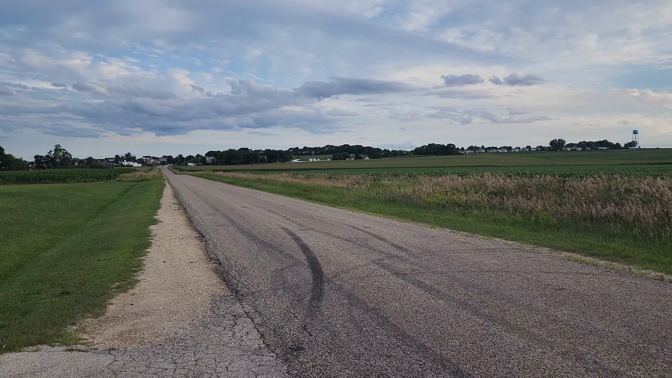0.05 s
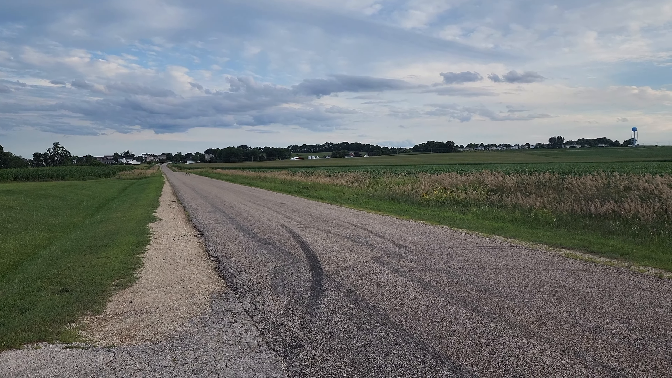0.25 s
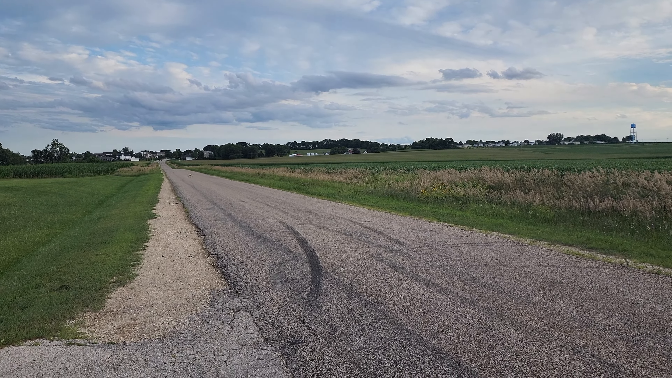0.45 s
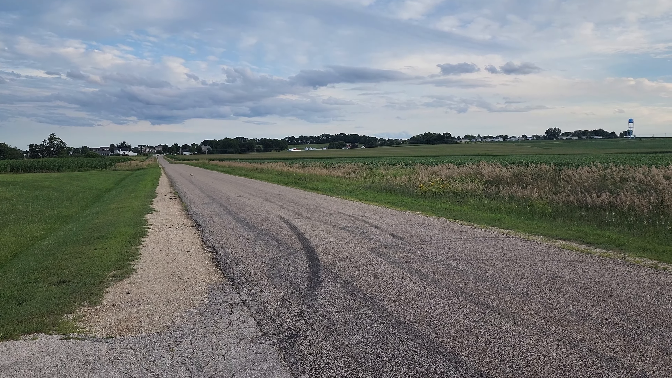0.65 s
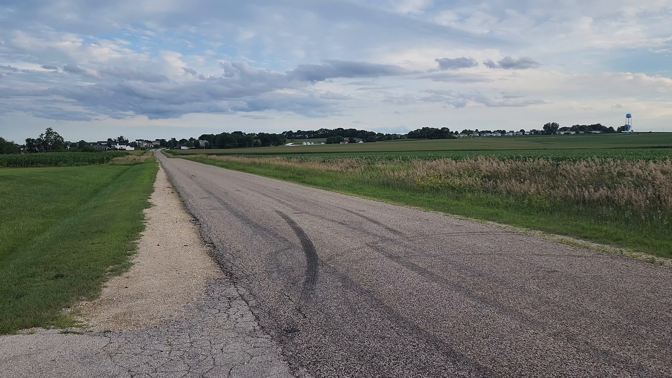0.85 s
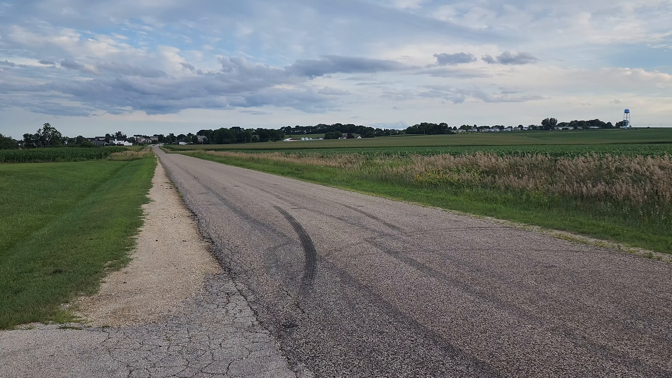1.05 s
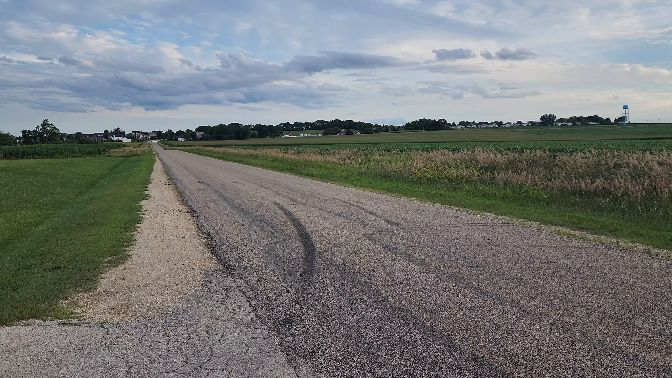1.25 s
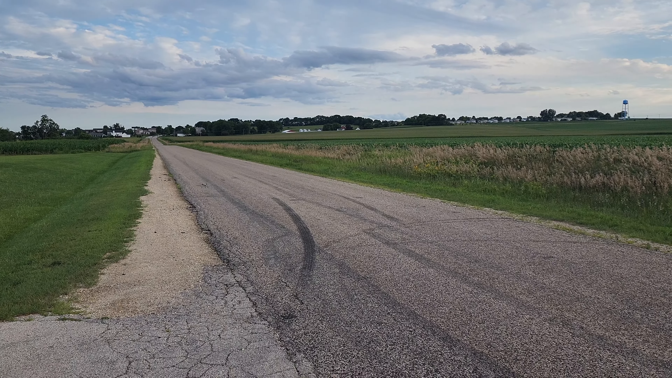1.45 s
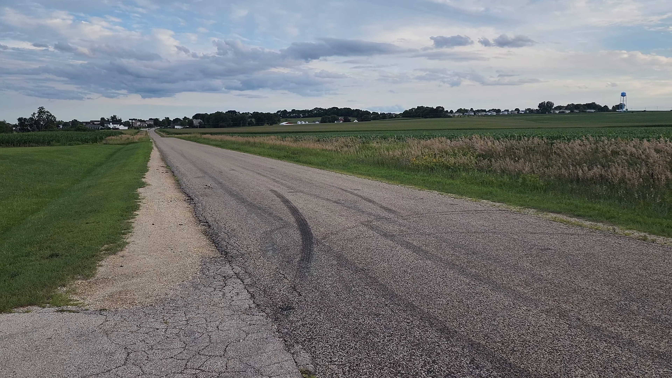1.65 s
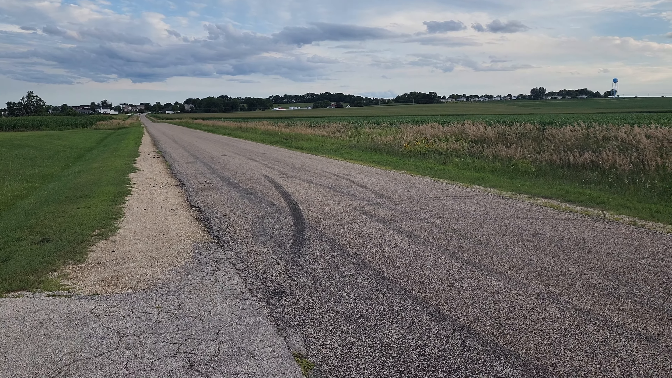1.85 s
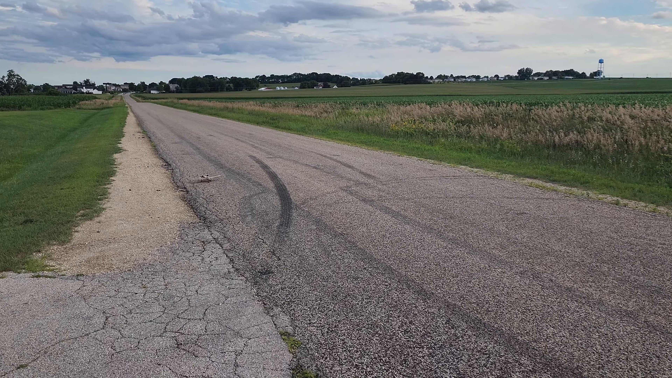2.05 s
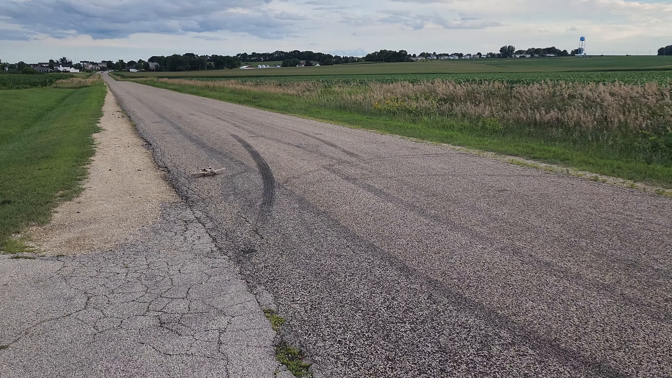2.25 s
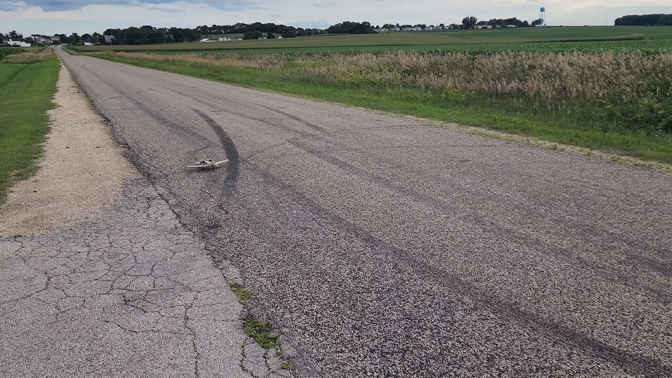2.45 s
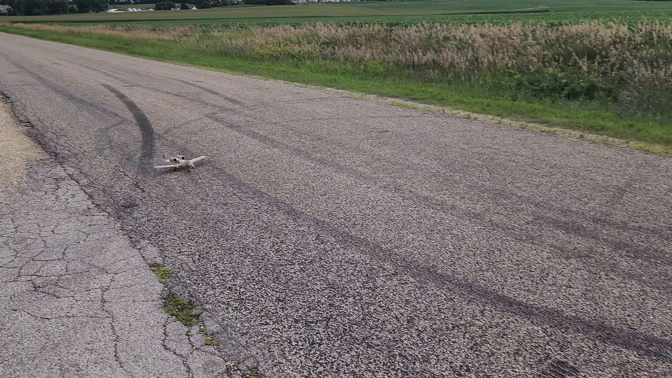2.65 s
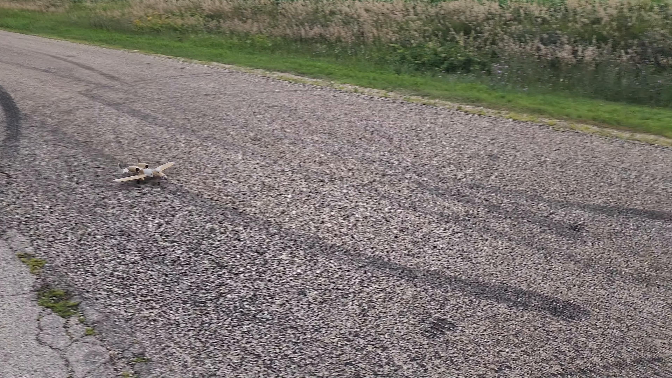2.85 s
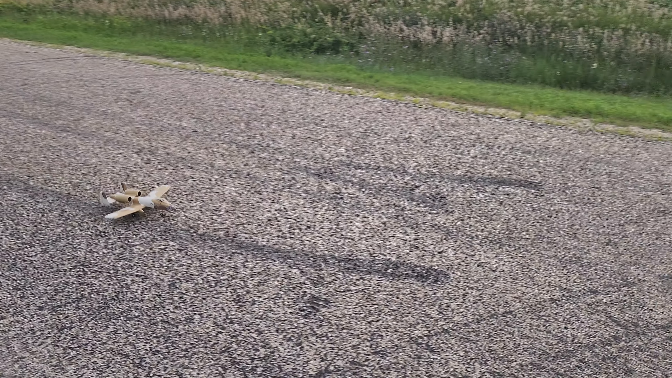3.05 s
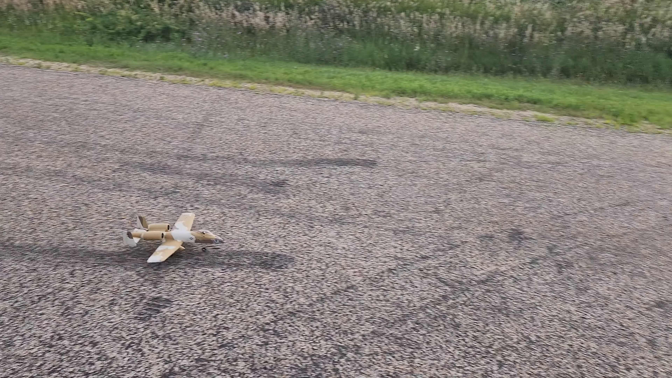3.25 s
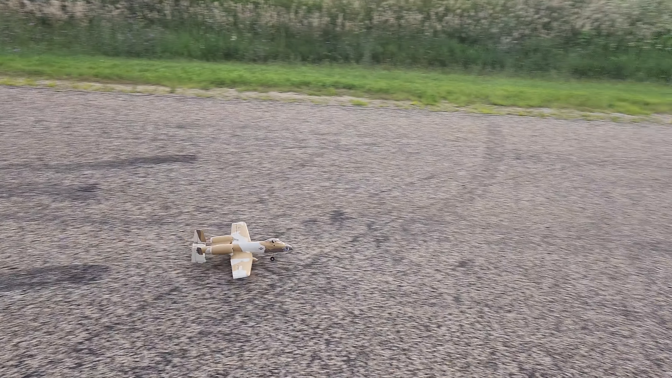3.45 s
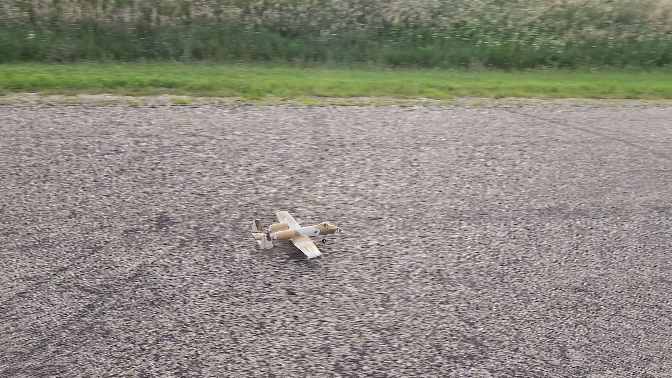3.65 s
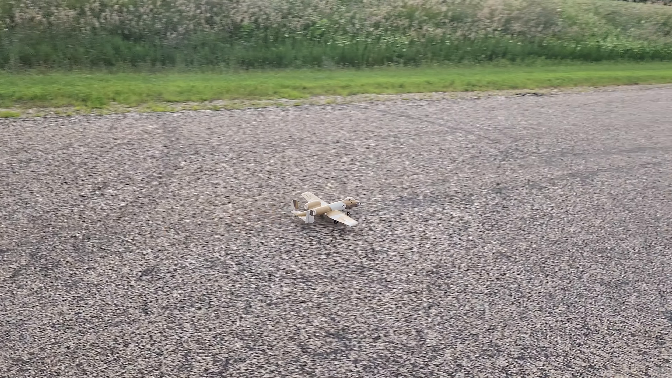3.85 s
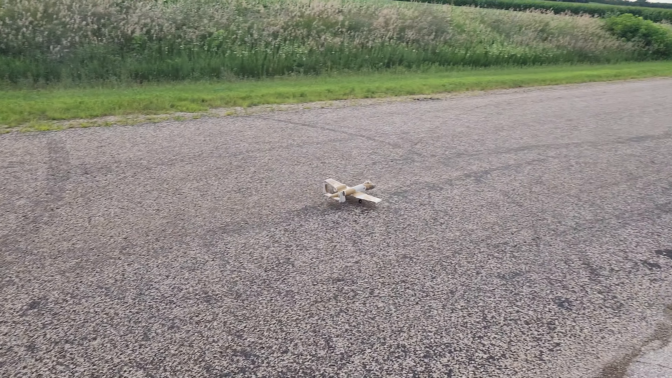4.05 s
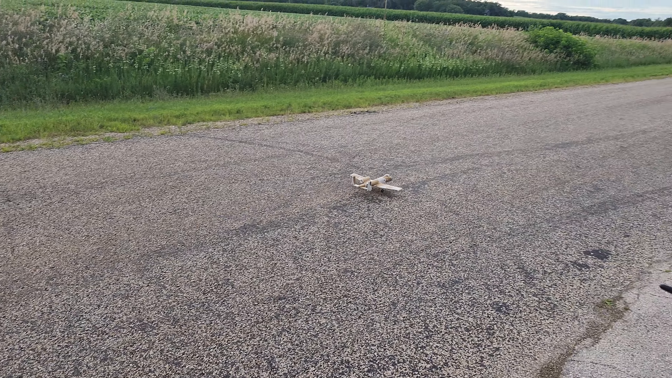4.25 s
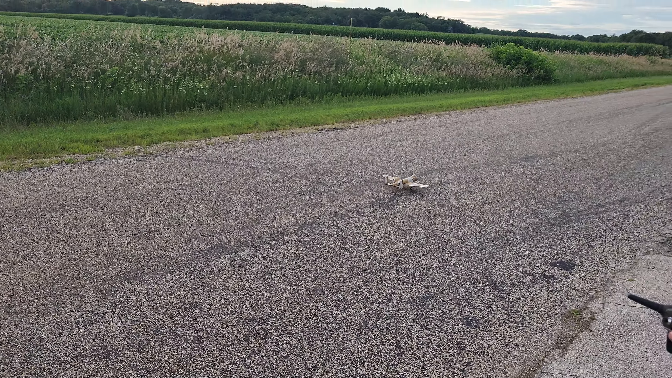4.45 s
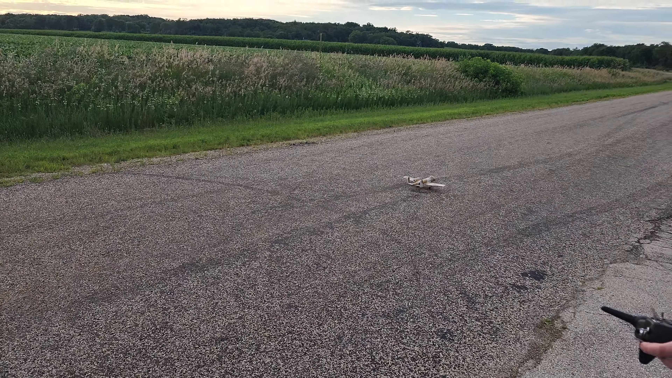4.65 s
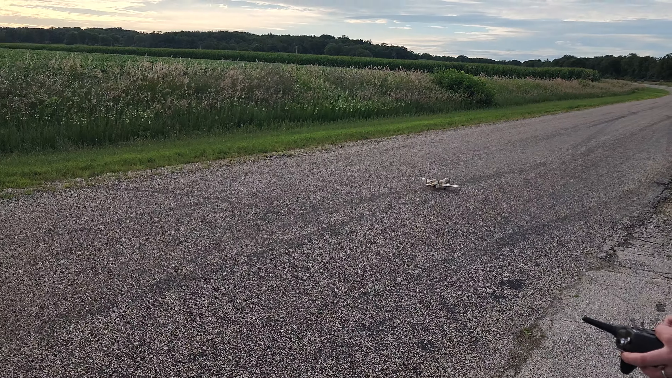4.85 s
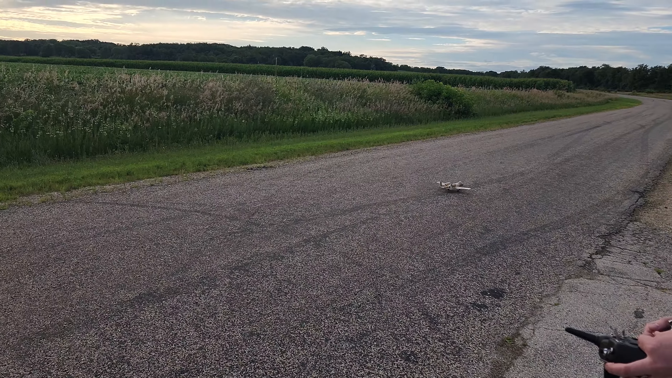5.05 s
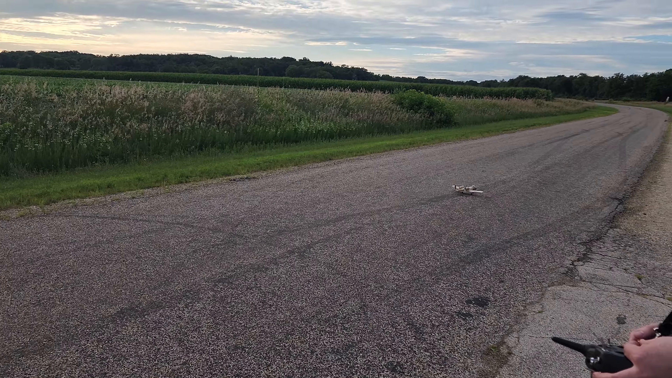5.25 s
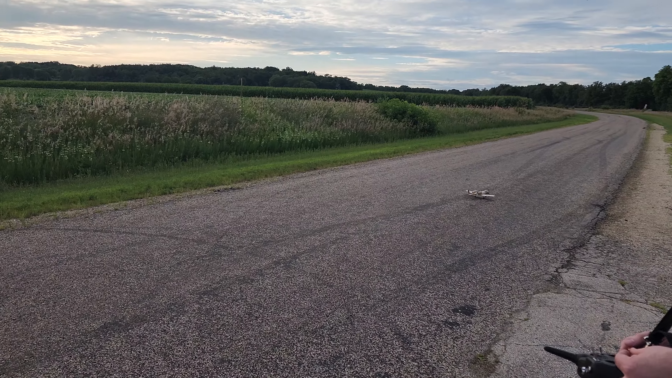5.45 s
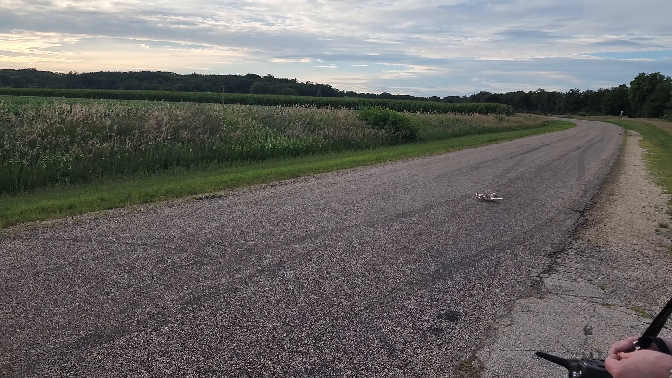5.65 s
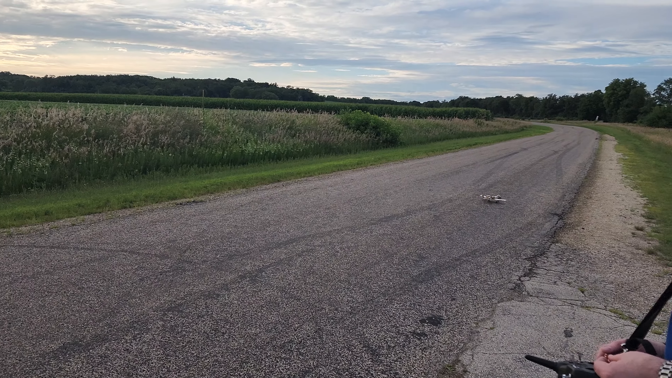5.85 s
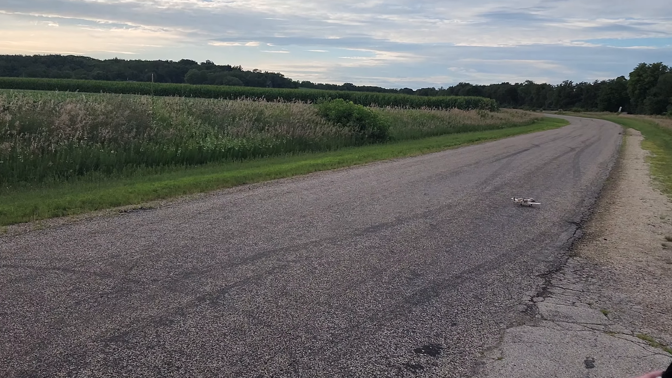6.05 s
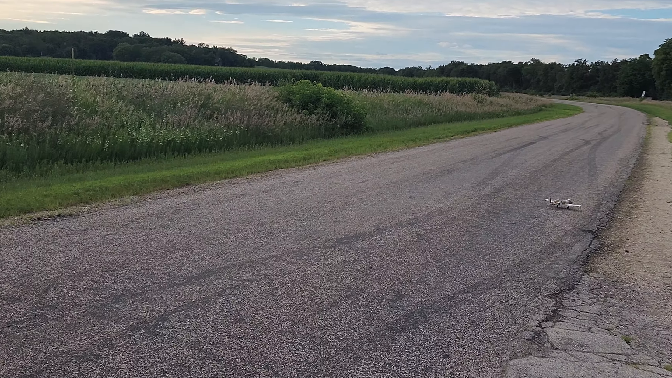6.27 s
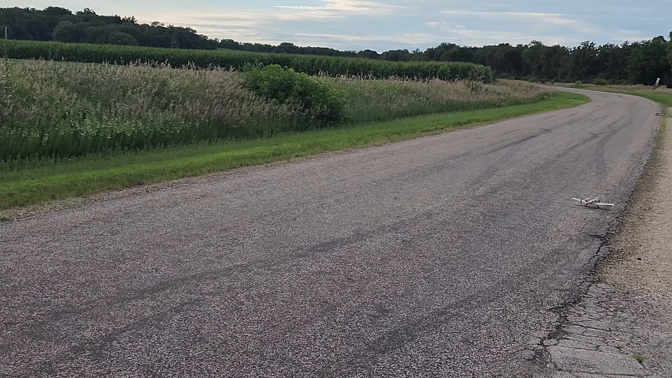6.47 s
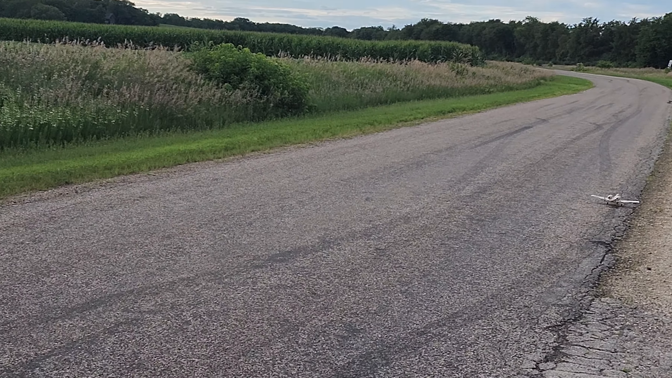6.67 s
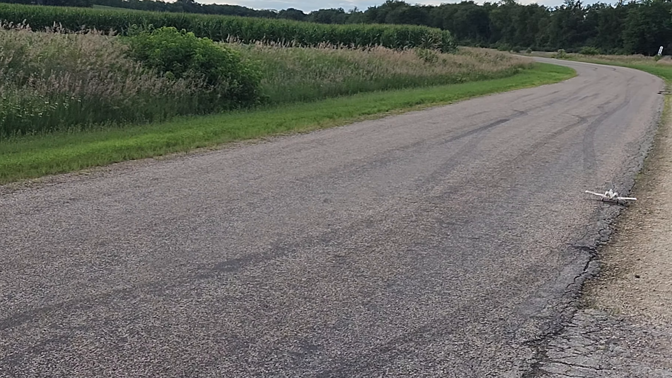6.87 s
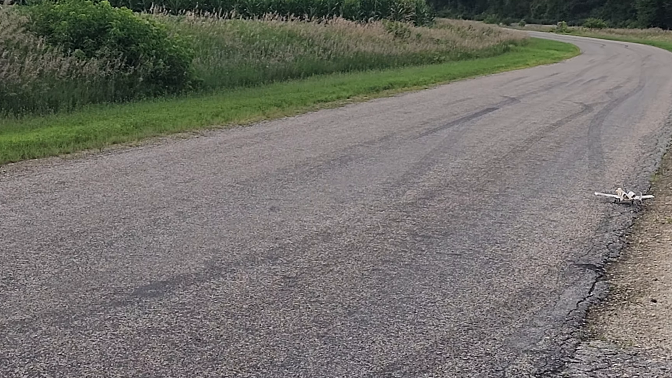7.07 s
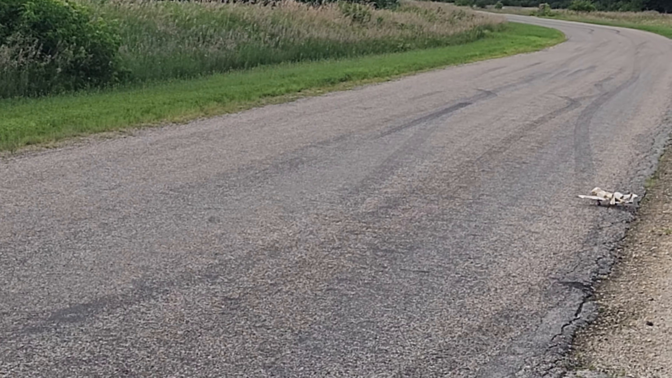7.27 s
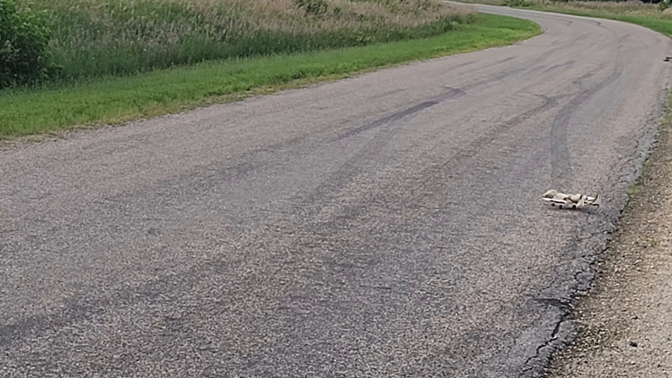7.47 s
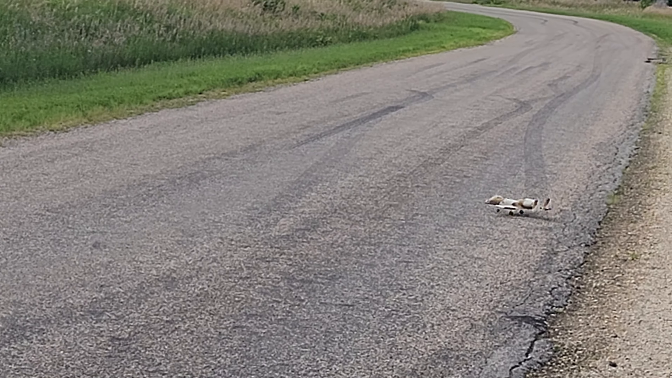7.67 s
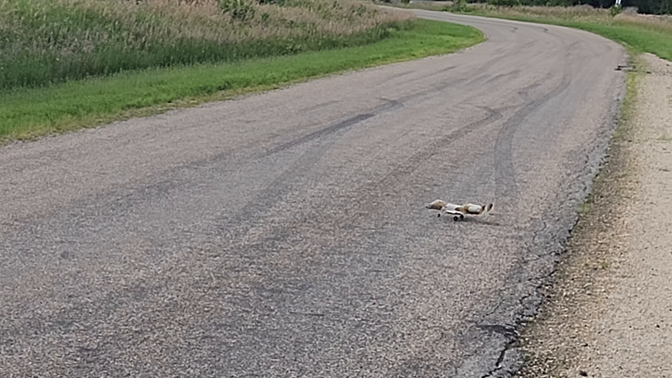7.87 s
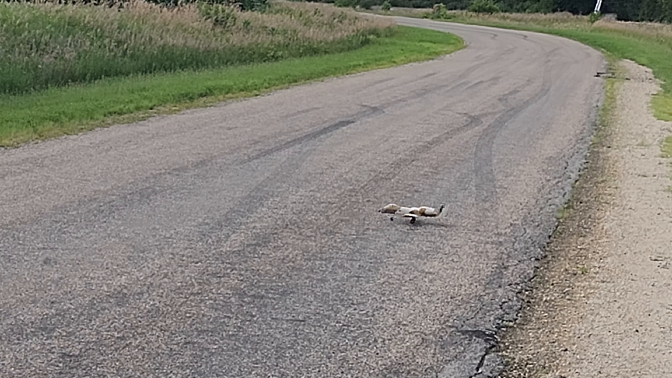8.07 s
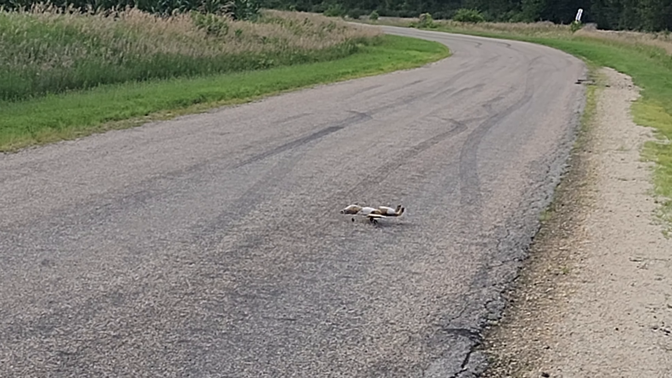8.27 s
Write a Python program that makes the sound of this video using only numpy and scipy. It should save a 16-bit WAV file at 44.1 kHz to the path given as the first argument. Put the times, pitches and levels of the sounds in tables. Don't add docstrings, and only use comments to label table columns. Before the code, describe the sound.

A small ducted-fan model jet whines in, throttles down, rattles past close on rough asphalt, then spools up in steps farther off amid wind rumble.

```python
import sys
import numpy as np
from scipy import signal
from scipy.fft import rfft, irfft, next_fast_len
from scipy.io import wavfile
from scipy.ndimage import uniform_filter1d, map_coordinates

SR = 44100
rng = np.random.default_rng(int(sys.argv[2]) if len(sys.argv) > 2 else 0)


def pcm_store(signal):
    levels = np.round(np.clip(np.atleast_2d(signal), -1, 1) * 32767)
    wavfile.write(sys.argv[1], SR, levels.astype(np.int16).T)


def nominal_scale(level):
    x = np.asarray(level, float) / 20
    return 10 ** x


N = 366468

# (time [s], nearness [dB])
AIR_IN = [(0, -64.5), (.2, -67.5), (.49, -65), (.81, -60), (1.02, -60.5), (1.15, -63), (1.32, -57.5),
          (1.72, -51), (2.08, -49.5), (2.3, -51), (2.55, -81)]
# (time [s], air [dB], load on the blades [dB])
AIR_OUT = [(6.18, -49, -59), (6.21, -43, -55), (6.3, -41.5, -58.5), (6.95, -48, -63), (7.15, -45.5, -52.5),
           (7.45, -40, -39), (7.7, -39.5, -33.5), (7.9, -44.5, -48.5), (8.05, -41, -32), (8.31, -43, -28)]
# (frequency [Hz], level [dB per Hz])
DUCT_IN = [(480, -16), (820, -0.5), (1150, -26.5), (1500, -12), (2400, -26), (3200, -4), (4200, -27),
           (4800, -17), (5300, -15.5), (6330, 0.5), (7300, -13), (9100, -13), (10400, -33), (11800, -9.5),
           (16000, -27)]
DUCT_OUT = [(350, -39), (750, -63), (1000, -2.5), (1370, -15), (1650, -3), (1900, -2.5), (2300, 1),
            (2850, -9), (3290, 7.5), (3900, -7), (4750, -3), (5600, -9), (8400, -12.5), (11000, -12.5),
            (16000, -18)]
# (time [s], spacing [Hz], strength [ratio])
GROUND_ECHO = [(0, 880, 0.29), (.75, 1060, 0.2), (1.6, 1326, 0.78), (2, 1420, 0.85), (2.1, 1440, 0.37)]

# (time [s], blade tone aimed at [Hz], lag of the rotor [s], drift [Hz per s])
THROTTLE_IN = [
    (0, 2984, 0.24, -38.5),
    (1.87, 2956, 0.023, -350),
    (1.994, 2143, 0.012, -400),
    (2.248, 450, .18, 0),
]
THROTTLE_OUT = [
    (6.18, 989.6, 0.19, 25.5),
    (7.12, 1103, 0.079, 44),
    (7.7, 1415, 0.05, 5),
    (7.746, 2094, 0.018, 209.5),
    (7.993, 2947, 0.043, 590),
]
# (multiple [-], level [dB], share of level swing [ratio], gain while speed changes [dB])
TONES_IN = [(1, -50.5, 0.016, -6), (2, -69, 0.91, -28.5), (3, -60, 1.7, -4), (5, -67, 0.87, 0)]
TONES_OUT = [(1, -45, 0.82, 9.7), (2, -58.5, 0.3, 13), (3, -57.5, 0.18, 6), (5, -58.5, 0.19, 1)]
# (frequency [Hz], gain [dB])
NOZZLE_IN = [(800, 3.5), (1700, 6.5), (3000, 2.5), (4300, -6), (6200, 6.5), (8800, -15), (10500, 6),
             (14000, -23)]
NOZZLE_OUT = [(1000, -1.5), (2100, 1.5), (3100, 6), (3500, 7), (4300, 8), (4900, -12), (5600, 3),
              (6400, 7.5), (8500, -17), (10700, 14.5), (12000, -10), (14000, -20)]
# (turns of the shaft [-], level [dB])
SHAFT_IN = [(9, -2.5), (10, -15), (14, -2), (15, -0.5), (17, 6), (23, -21), (25, -9), (32, -18), (33, -12),
            (34, -14)]
SHAFT_OUT = [(1, 16), (3, -3), (4, 7), (6, 5), (7, 2), (9, 2), (10, 7), (12, 0), (13, 1), (15, -3),
             (17, -5), (18, 5), (19, -4), (20, -1), (23, -5), (25, -4), (26, -5), (32, -8), (33, -2),
             (35, -2), (39, -7), (48, -2), (49, -7), (56, -1), (58, -5)]
# (frequency [Hz], gain [dB])
COWL_IN = [(2700, -30.5), (3200, -3.5), (3600, 13), (4000, -32), (4900, -19), (5400, -4.5)]
COWL_OUT = [(290, -45), (380, -22), (700, -30), (1100, 0), (1500, -16), (1900, -14), (2300, 1), (3400, 4),
            (3900, -9), (4750, -5), (5400, -12), (7000, -10), (15000, -5)]
# (time [s], lead on the first [blade passes], strength against it [ratio])
TWIN_IN = [(0, 0, .12), (2.55, 42, .12)]
TWIN_OUT = [(6.18, -12, .15), (7.96, -1, .15), (7.99, -.4, .6), (8.035, .5, .7), (8.05, 1, .6),
            (8.068, 1.35, .5), (8.135, 1, .7), (8.17, .5, .8), (8.22, -.5, .8), (8.26, -1.5, .85),
            (8.31, -2.75, .7)]

# (time [s], level [dB])
GUSTS = [(0.0, -47.5), (0.25, -55), (3.61, -52), (4.67, -54), (4.7, -46), (4.86, -54.5), (5.58, -49),
         (5.69, -49), (5.74, -52), (5.99, -45), (6.02, -50), (6.27, -47), (6.39, -52), (6.55, -45),
         (7.75, -50), (7.87, -42), (8.24, -46.5), (8.31, -45)]
# (level over the gust [dB], growth with it [ratio], own swells [dB])
GUST_LAYERS = [
    (-5, 1, 1.5),
    (-1, 0.86, 0.8),
]
# (frequency [Hz], level [dB per Hz])
BUFFET = [(11, -38), (18, -34), (43, 4.5), (76, -10.5), (90, -0.5), (120, -42), (200, -120)]
RUMBLE = [(41, -70), (70, 3), (194, -4), (220, -13.5), (280, -11), (420, -49.5), (550, -70), (920, -120)]
# (frequency [Hz], level [dB per Hz])
FIELD = [(200, -1.5), (500, -17), (800, -3), (2000, -16), (3300, -11), (4300, -21), (6000, -19),
         (16000, -22)]

# (time [s], level [dB])
TRILL = [
    (1.68, -61),
    (1.71, -55),
    (1.735, -59),
]
# (time [s], peak [dB])
STONES = [(2.1533, -24), (2.419, -38), (2.432, -16), (2.7588, -24), (2.7037, -16), (2.8563, -12),
          (3.08, -17), (3.199, -16), (3.2908, -8), (3.317, -5.5), (3.344, -13), (3.3717, -8), (3.4308, -23),
          (3.817, -19), (3.455, -11), (3.559, -4), (3.6309, -12), (3.755, -13), (3.885, -16), (3.915, -12),
          (4.0489, -38), (4.002, -23), (4.106, -20), (4.2514, -29), (4.461, -24), (4.4874, -35),
          (4.58, -21), (4.293, -18), (4.3188, -13.5), (4.3458, -19), (4.4213, -19.5), (4.5282, -22),
          (4.6308, -23), (4.843, -20.5), (4.803, -26), (4.869, -23), (4.937, -26), (5.0372, -30),
          (5.0845, -41), (5.149, -32), (5.2207, -39), (5.2887, -23), (1.871, -30), (7.2, -27), (7.3, -32),
          (7.42, -33), (7.768, -24), (7.97, -28)]
# (time [s], nearness [dB], tail turned to the ports [-1..1])
ROLL = [(2.08, -61.5, 1), (2.14, -40.5, -0.37), (2.3, -45, 0.39), (2.55, -44.5, 0.15), (3.03, -37, -0.17),
        (3.29, -32.5, 0.0055), (3.46, -33, 0.55), (3.72, -32.5, -0.015), (3.95, -37.5, 0.23),
        (4.27, -41.5, -0.15), (4.7, -45.5, -0.22), (5.4, -47.5, -0.51), (5.6, -50.5, -0.17),
        (6.15, -54, 0.11), (7, -55.5, 0.28), (7.4, -59, 0.48), (7.8, -62, 0.38), (8.31, -56.5, -0.43)]
# (frequency [Hz], level [dB per Hz])
AIRFRAME = [(120, -12.5), (250, -6.5), (430, -7), (550, -13.5), (750, -0.5), (1320, -5.5), (2170, -10.5),
            (3370, -9), (5000, -7), (7400, -1), (9300, -8), (11300, -11.5), (13600, -7.5), (16000, -8.5)]
RATTLE_EDGES = [200, 600, 2600, 9000, 17000]
# (level at middle distance [dB], growth with nearness [ratio], gain per turn of the tail [dB])
RATTLE = [
    (-55.5, 1.07, 7),
    (-44, 1.136, -2),
    (-42.5, 0.82, 8),
    (-47, 1.18, 11),
]
HIDDEN_DB = [4.5, 0, -0.5, 12]
# (time [s], extra level [dB])
JOLTS = [
    (2.37, 6),
    (2.421, 19),
    (2.6, 13),
    (3.32, -2),
    (3.977, 21.5),
]
# (time [s], comb spacing
# [Hz], strength [ratio])
FUSELAGE_ECHO = [(2, 650, 0.25), (2.6, 756, -0.17), (3.099, 827, -0.53), (3.5, 966, -0.51), (4, 854, -0.44),
                 (4.5, 834, -0.5), (5.5, 764, -0.56), (8.31, 760, -0.39)]
UPPER_COMB = [(2, 4300, -1.25), (2.5, 4300, -1.2), (2.85, 4200, -.9), (3.05, 3000, -.7), (3.5, 3300, -.6),
              (4, 3400, -.6), (4.3, 3350, -.8), (5.4, 3200, -0.7), (8.31, 3560, 0)]

# (time [s], pitch [Hz], level [dB])
CHIRP = [
    (4.77, 3140, -63),
    (4.86, 2800, -60),
    (4.874, 2690, -59),
    (4.92, 2780, -68),
]
# (time [s], peak [dB], length [s], low push [dB])
SCUFFS = [(5.43, -37.5, 0.01, -20), (5.529, -36.5, 0.042, -13), (5.588, -34.5, 0.037, -19),
          (5.627, -34.5, 0.031, 0.5), (5.681, -39, 0.017, -11), (5.758, -39, 0.064, -8.5),
          (5.841, -36, 0.013, -6), (5.865, -28, 0.021, -6.5), (5.963, -34.5, 0.018, -39),
          (6.045, -45.5, 0.033, -29), (6.108, -47.5, 0.026, -35)]
# (time [s], peak [dB], low push [dB])
TICKS = [
    (5.536, -25, -20),
    (5.627, -22, -16),
    (5.683, -21.5, -7.5),
    (5.9774, -14.5, -14.5),
    (6.096, -40, -22),
]
# (frequency [Hz], level [dB per Hz])
FINGER = [(88, -4), (150, -15), (534, -10.5), (1190, -8), (1450, -11.5), (1630, -4.5), (3040, -13),
          (6140, -13), (14500, -28.5), (16000, -28)]

# (time [s], left lag [samples],
# left-right in bass [dB], middle [dB], treble [dB], unlike share [ratio])
BEARING = [(0, -6, 2, 0, 4, .35), (1.7, -5.6, 1, -1, 5, .2), (2.1, -5.8, 1.5, 0, 3.5, .15),
           (2.68, -6, 0, 0, 3, .2), (2.83, -7, 0, 0, 3, .25), (2.97, -9, 0, 0, 3, .25),
           (3.12, -9.6, 1, 0, 2, .22), (3.42, -6.3, -2, 1, 1.5, .25), (3.72, -4.6, -3, 1, 1, .25),
           (4.2, -2, -3, 2, 0, .22), (4.7, .5, -2.5, 2, -1, .22), (5.4, 2.8, -2, 2, -1, .28),
           (6.17, 3, 0, 6, 8, .2), (6.55, 2.2, 1, 7, 8.5, .22), (6.9, 0, 2, 6, 10, .22),
           (7.5, -1, 2, 6, 9.5, .17), (8.31, -1.8, 2.5, 6, 7, .17)]
# (time [s], share [ratio])
ROUND_HOUSING = [(3.3, 0), (3.55, 1), (5.4, 1), (6.1, 0)]


def unit(x):
    return x / np.sqrt(np.mean(x ** 2) + 1e-20)


def along(points, hz):
    f, v = np.transpose(points)
    return np.interp(np.log(hz + 1), np.log(f + 1), v)


def curves(rows):
    s, *cols = np.transpose(rows)
    return [np.interp(np.arange(N) / SR, s, c) for c in cols]


def gate(rows, edge=0.0092):
    start, end = rows[0][0], rows[-1][0]
    return np.interp(np.arange(N) / SR, [start - edge, start, end, end + edge], [0, 1, 1, 0])


def wobble(rate):
    knots = rng.standard_normal(int(N * rate / SR) + 4)
    at = np.arange(0, N + 16, 16)
    return np.interp(np.arange(N), at, map_coordinates(knots, [at * rate / SR]))


def filtered(x, response):
    m = next_fast_len(N + 8192)
    return irfft(rfft(x, m) * response(np.fft.rfftfreq(m, 1 / SR)), m)[..., :N]


def coloured(x, spectrum, lo_hz=0, hi_hz=1e5):
    def response(hz):
        low_edge = hz ** 8 / (hz ** 8 + lo_hz ** 8 + 1)
        high_edge = hi_hz ** 8 / (hz ** 8 + hi_hz ** 8)
        return nominal_scale(along(spectrum, hz)) * np.sqrt(low_edge * high_edge)
    return unit(filtered(x, response))


def patchy(depth_db):
    z = signal.stft(rng.standard_normal((3, N)), nperseg=512)[2]
    field = uniform_filter1d(rng.standard_normal(z.shape[1:]), size=5, axis=0)
    field = uniform_filter1d(field, size=16, axis=1)
    return signal.istft(z * nominal_scale(depth_db * unit(field)), nperseg=512)[1][:, :N]


def echoed(x, rows, size, wide=0):
    spacing, strength = curves(rows)
    dull = uniform_filter1d(x, size=size)
    if wide:
        dull = dull - uniform_filter1d(x, size=wide)
    arrival = np.arange(N) - SR / spacing
    return x + strength * np.array([np.interp(arrival, np.arange(N), v) for v in dull])


def duct_air():
    noise = patchy(depth_db=4.0) * nominal_scale(0.53 * wobble(25) + 0.66 * wobble(13))
    air = 0
    for rows, duct, trim_db in ((AIR_IN, DUCT_IN, 1.5), (AIR_OUT, DUCT_OUT, 2.5)):
        air = air + gate(rows) * nominal_scale(curves(rows)[0] + trim_db) * coloured(noise, duct)
    touchdown_s = 2.1
    air = air * (1 - gate([(touchdown_s,), (AIR_IN[-1][0] + 1,)], edge=0.028))
    return echoed(air, GROUND_ECHO, size=1)


def rotor(throttle, start_hz, half_per_s):
    t = np.arange(N) / SR
    hz = np.full(N, float(start_hz))
    for s, aim, lag, drift in throttle:
        u = np.clip(t - s, 0, None)
        closing = (np.interp(s, t, hz) - aim) * np.exp(-u / lag)
        hz = np.where(t < s, hz, aim + drift * u + closing)
    ramp_s = 0.012
    hz = np.clip(uniform_filter1d(hz, size=int(ramp_s * SR) + 1), 100, None)
    change = abs(np.gradient(np.log(hz))) * SR
    return hz, change ** 2 / (change ** 2 + half_per_s ** 2)


def whine(rows, speed, tones, orders, nozzle, shaft, cowl, twin):
    blades, smear = 8, .35
    span = slice(round(rows[0][0] * SR), round(rows[-1][0] * SR))
    hz, surge, swing = [c[span] for c in (*speed, curves(rows)[-1])]

    def level(db, share, surge_db):
        return db + share * (swing - swing.mean()) + surge_db * surge

    haze = 1 + .15 * (1 + surge) * wobble(1200)[span] * hz / hz.max() * (swing > swing.mean())
    unsteady_hz = hz + 7 * wobble(50)[span] + 5 * wobble(14)[span]
    turn = 2 * np.pi * np.cumsum(unsteady_hz / blades) / SR
    ahead, second = [c[span] for c in curves(twin)]
    flutter_db = [wobble(30)[span] for _ in range(3)]
    fade_db = [2 * wobble(3)[span] for _ in range(3)]
    blur = .3 * wobble(220)[span]
    out = np.zeros(N)
    for k, *rule in tones:
        db = level(*rule) + along(nozzle, k * hz) + 1.0 + np.sqrt(k) * flutter_db[k % 3]
        smeared = (k - .6) * blur
        first_rotor = np.sin(k * blades * turn + smeared)
        second_rotor = second * np.sin(k * (blades * turn + 2 * np.pi * ahead) + smeared)
        out[span] += nominal_scale(db) * haze * (first_rotor + second_rotor) / np.sqrt(1 + second ** 2)
    shaft_db = level(*orders)
    for order, db in shaft:
        pitch = order * hz / blades
        wake_db = 9 * (order <= 13) * np.log2(hz / hz.max())
        moving_db = 1.4 * flutter_db[order % 3] + fade_db[order % 3]
        order_db = shaft_db + db + wake_db + moving_db + along(cowl, pitch)
        phase = order * turn + np.sqrt(order) * smear * blur + rng.uniform(0, 2 * np.pi)
        out[span] += nominal_scale(order_db) * (pitch < 15800) * np.sin(phase)
    return out * gate(rows)


def landing_whine():
    speed = rotor(THROTTLE_IN, start_hz=3000, half_per_s=9)
    orders = (-59, .8, -20)
    return whine(AIR_IN, speed, TONES_IN, orders, NOZZLE_IN, SHAFT_IN, COWL_IN, TWIN_IN)


def wind():
    gust_db, = curves(GUSTS)
    out = 0
    for (db, grows, swell_db), spectrum in zip(GUST_LAYERS, (BUFFET, RUMBLE)):
        both, *own = coloured(rng.standard_normal((3, N)), spectrum)
        level_db = gust_db.mean() + db + grows * (gust_db - gust_db.mean())
        level_db = level_db + swell_db * wobble(2.5) + 1.84 * wobble(13)
        out = out + nominal_scale(level_db) * (both + .3 * np.array(own))
    return out + nominal_scale(-65.5) * coloured(rng.standard_normal((2, N)), FIELD, 250)


def knock():
    start_s, t60_s = .346, 0.046
    t = np.clip(np.arange(N) / SR - start_s, 0, None)
    return nominal_scale(-42 - 60 * t / t60_s) * np.sin(2 * np.pi * 236 * t)


def trill():
    note_s, start_hz, fall_hz = 0.014, 2800, 802
    u = np.linspace(0, 1, int(note_s * SR))
    note = np.sin(np.pi * u) * np.sin(2 * np.pi * np.cumsum(start_hz - fall_hz * u) / SR)
    out = np.zeros(N)
    for s, db in TRILL:
        out[round(s * SR):][:len(u)] += nominal_scale(db) * note
    return out


def stones():
    out, t = np.zeros(N), np.arange(1200) / SR
    for s, db in STONES:
        decay = nominal_scale(db - 14.0 - 60 * t / 0.045)
        out[round(s * SR):][:len(t)] += decay * np.minimum(t / 0.0016, 1) * rng.standard_normal(len(t))
    return coloured(out, AIRFRAME) * np.std(out)


def wheels():
    grain_db = 9.2 * rng.exponential(size=N).clip(0, 2)
    grains = (rng.random(N) < 700 / SR) * rng.standard_normal(N) * nominal_scale(grain_db)
    chatter = nominal_scale(1.37 * wobble(45) + 1.76 * wobble(160) + 0.19 * wobble(15))
    shake = unit(chatter * (patchy(depth_db=.8) + .2 * unit(grains)))
    near_db, tail = curves(ROLL)
    t = np.arange(N) / SR
    level_s, uncover_s, jolt_s, middle_db = 2.52, 0.61, 0.013, -42
    screened = np.clip((level_s - t) / uncover_s, 0, 1)
    jolt_db = sum(db * np.exp(-((t - s) / jolt_s) ** 2) for s, db in JOLTS)
    jolt_share = [0.74, 0.17, 0.051, 0.28]
    rolling = 0
    bands = zip(RATTLE, jolt_share, HIDDEN_DB, RATTLE_EDGES, RATTLE_EDGES[1:])
    for (db, grows, tail_db), share, hidden_db, lo, hi in bands:
        band_db = db + grows * (near_db - middle_db) + tail_db * tail
        band_db = band_db + share * jolt_db - hidden_db * screened
        rolling = rolling + nominal_scale(band_db) * coloured(shake, AIRFRAME, lo, hi)
    rattle = echoed(gate(ROLL, edge=0.038) * rolling + stones(), FUSELAGE_ECHO, size=5)
    return nominal_scale(-2.5) * echoed(rattle, UPPER_COMB, size=5, wide=25)


def chirp():
    hz, db = curves(CHIRP)
    tone = gate(CHIRP) * nominal_scale(db + 3.5) * np.sin(2 * np.pi * np.cumsum(hz) / SR)
    return tone * nominal_scale([[-4], [3]])


def finger():
    rasp, push, ticks, t = np.zeros(N), np.zeros(N), np.zeros(N), np.arange(N) / SR
    for s, db, length, push_db in SCUFFS:
        corners = [s, s + 0.0084, s + 0.0021 + length, s + 0.025 + length]
        shape = np.interp(t, corners, [0.0022, 0.71, 0.75, 0.0058])
        rasp += nominal_scale(db) * shape
        push += nominal_scale(db + push_db) * shape
    u = np.arange(600) / SR
    for s, db, push_db in TICKS:
        snap = -np.sin(2 * np.pi * 1500 * u) * nominal_scale(-60 * u / 0.0027)
        snap = snap + 0.41 * rng.standard_normal(len(u)) * nominal_scale(-60 * u / 0.0011)
        thump = nominal_scale(push_db) * np.sin(2 * np.pi * 170 * u) * nominal_scale(-60 * u / 0.034)
        ticks[round(s * SR):][:len(u)] += nominal_scale(db + 4.5) * (snap + thump)
    noise = rng.standard_normal((2, N)) * nominal_scale(2.6 * wobble(250))
    left = rasp * coloured(noise[0], FINGER, 660) + push * coloured(noise[1], FINGER, 110, 287) + ticks
    return np.array([left, nominal_scale(-57) * np.roll(left, -9)])


def taxi_whine():
    speed = rotor(THROTTLE_OUT, start_hz=963.4, half_per_s=3)
    orders = (-54, .45, 0)
    return whine(AIR_OUT, speed, TONES_OUT, orders, NOZZLE_OUT, SHAFT_OUT, COWL_OUT, TWIN_OUT)


def at_ports(noise, tones):
    lag, *balance_db, unlike = curves(BEARING)
    bent, = curves(ROUND_HOUSING)
    parts = np.vstack([noise, tones])
    low, under = [filtered(parts, lambda hz: 1 / (1 + (hz / edge) ** 6)) for edge in (2600, 5400)]
    treble = parts - under
    out = []
    for own, side, detour in ((1, 0.89, -2), (2, -1.157, 3)):
        high = (1 - bent) * treble + bent * np.roll(treble, detour, axis=1)
        common, alone = 0, 0
        for band, grows, db in zip((low, under - low, high), (.5, .45, 1.3), balance_db):
            gain = nominal_scale(side * db / 2)
            common = common + gain * (np.sqrt(1 - grows * unlike) * band[0] + band[-1])
            alone = alone + gain * np.sqrt(grows * unlike) * band[own]
        arrival = np.arange(N) - side * lag / 2
        out.append(map_coordinates(common, [arrival], mode="nearest") + alone)
    return np.array(out)


def scene():
    jet = at_ports(duct_air() + wheels(), landing_whine() + taxi_whine())
    return jet + wind() + knock() + trill() + chirp() + finger()


def band_limit(x):
    return signal.sosfilt(signal.butter(12, 16180, fs=SR, output="sos"), x)


def record(dry):
    mix = filtered(dry, lambda hz: hz < 15830)
    return band_limit(mix)


dry = scene()
out = record(dry)
pcm_store(out)
```